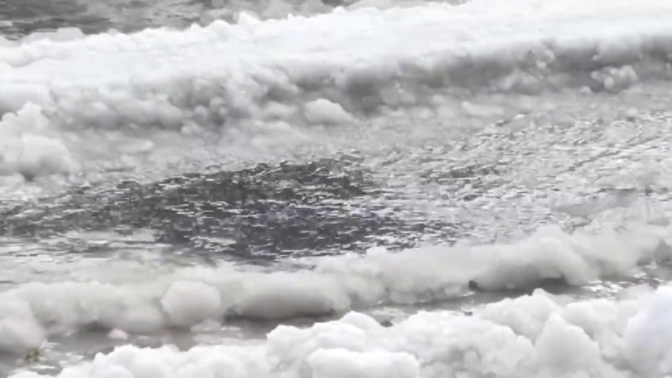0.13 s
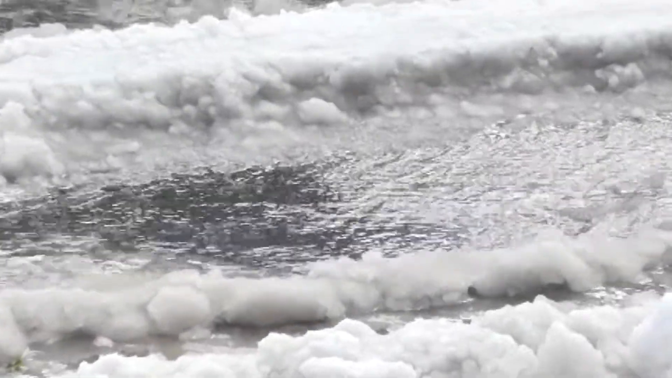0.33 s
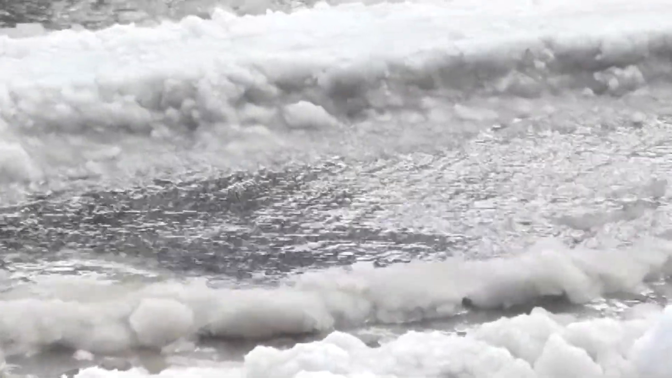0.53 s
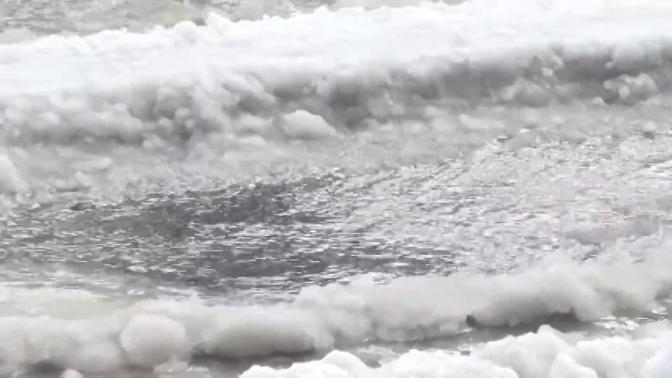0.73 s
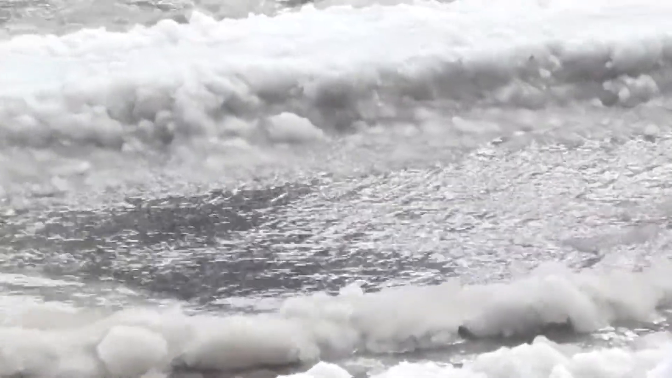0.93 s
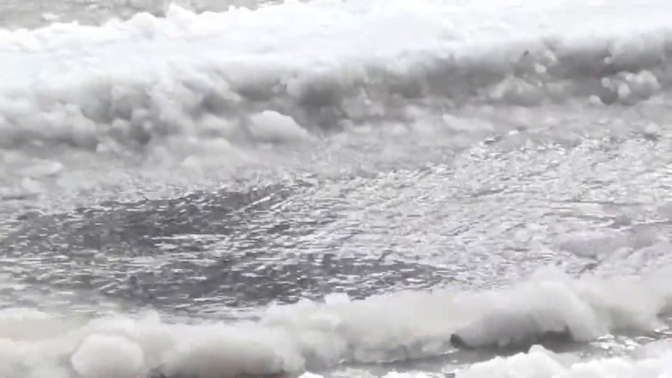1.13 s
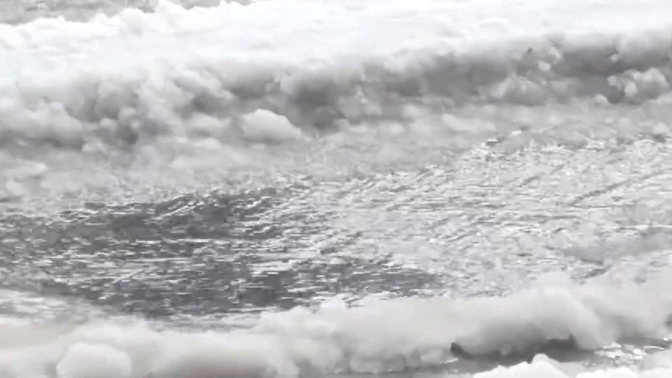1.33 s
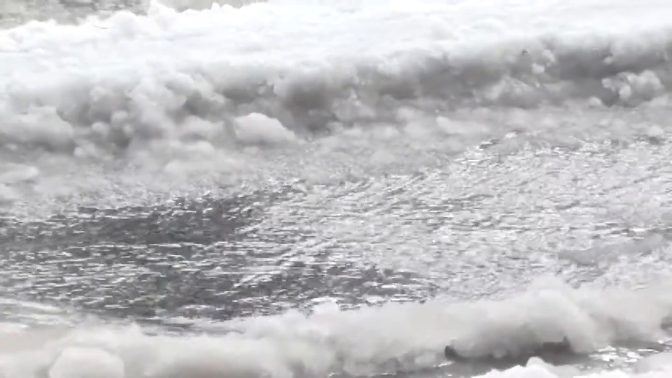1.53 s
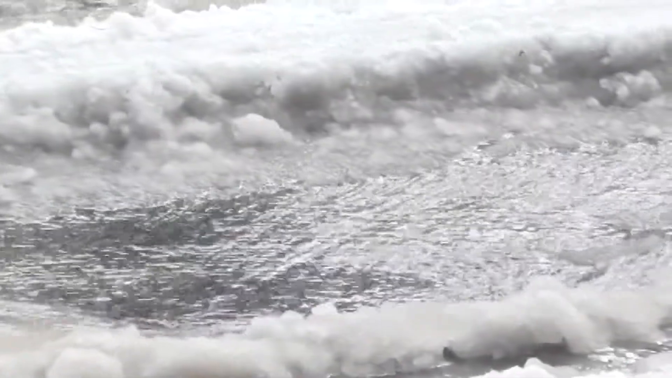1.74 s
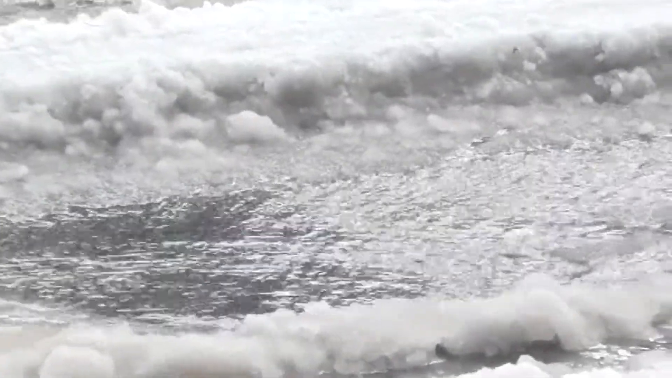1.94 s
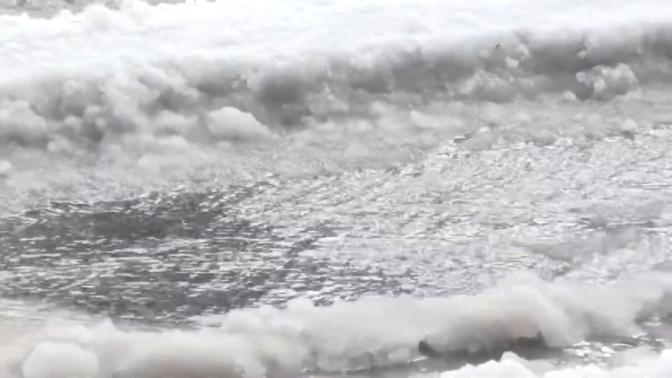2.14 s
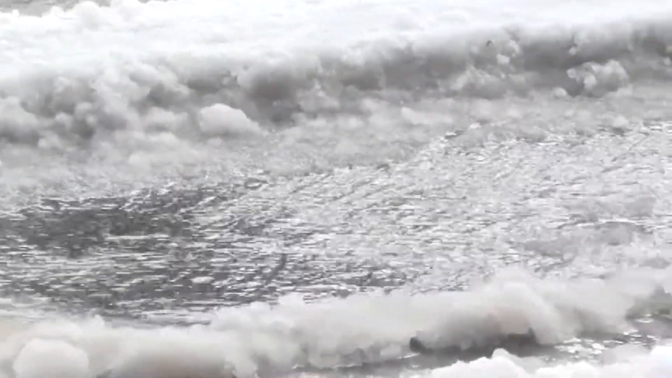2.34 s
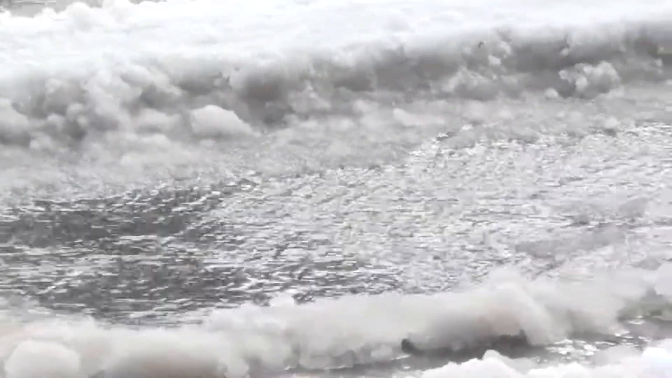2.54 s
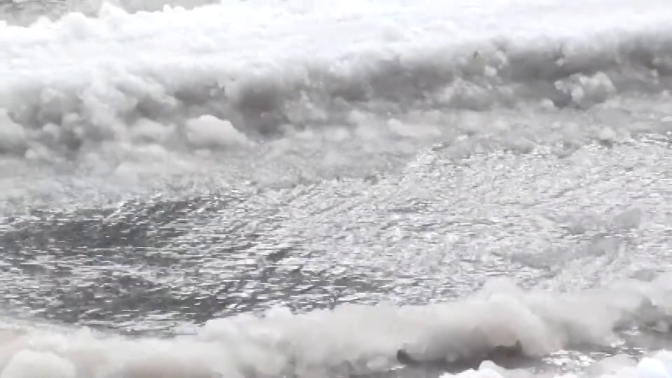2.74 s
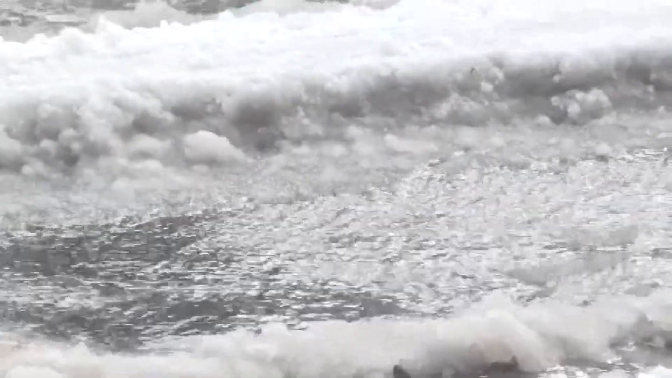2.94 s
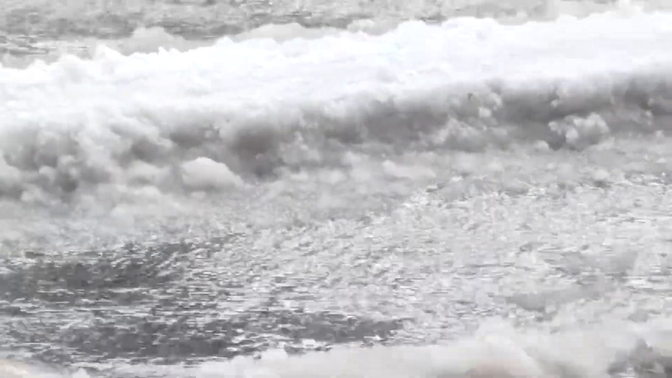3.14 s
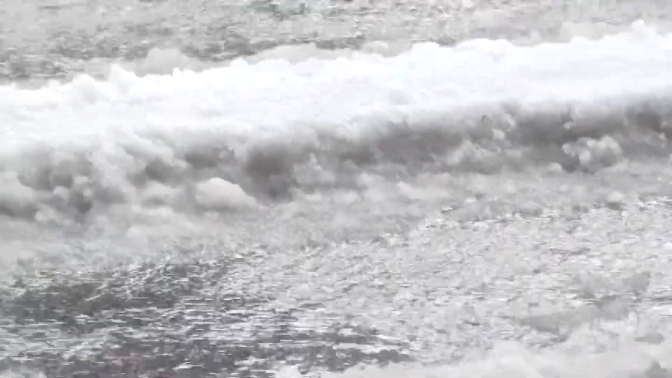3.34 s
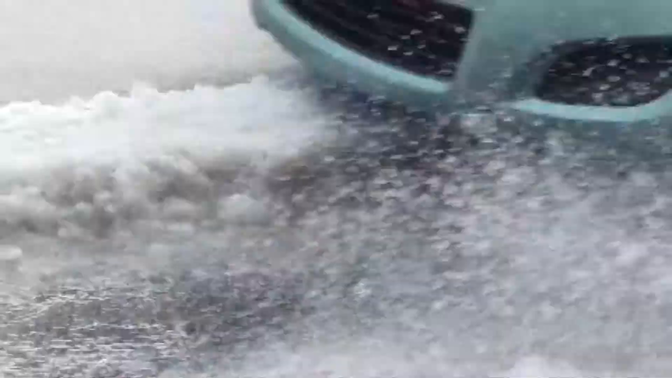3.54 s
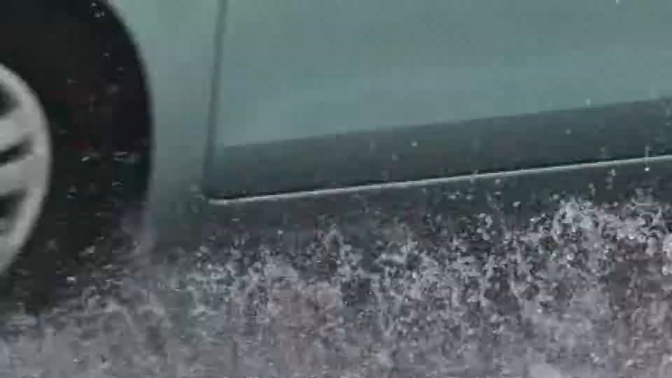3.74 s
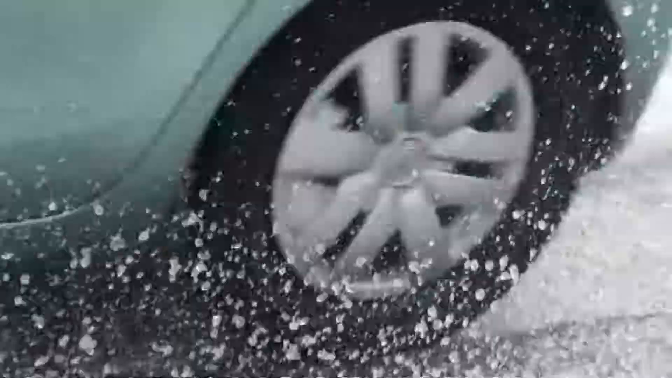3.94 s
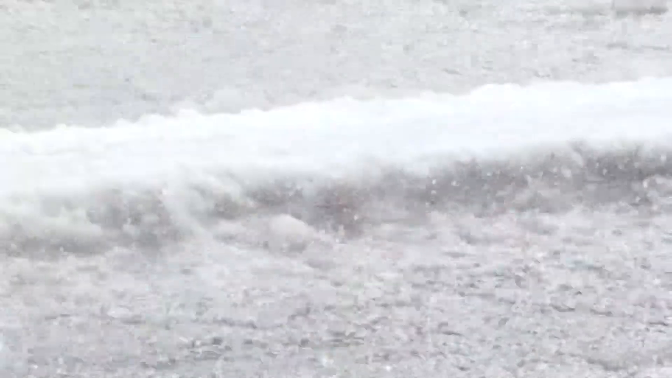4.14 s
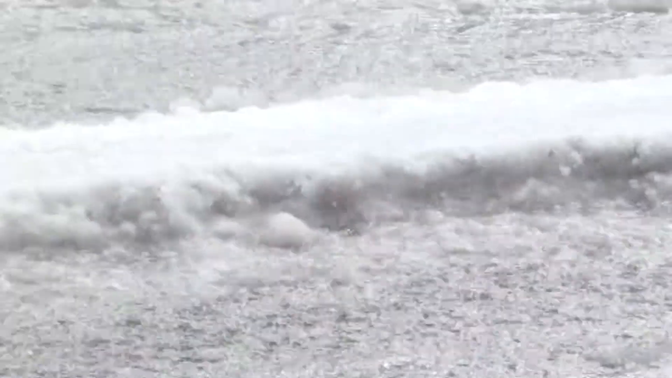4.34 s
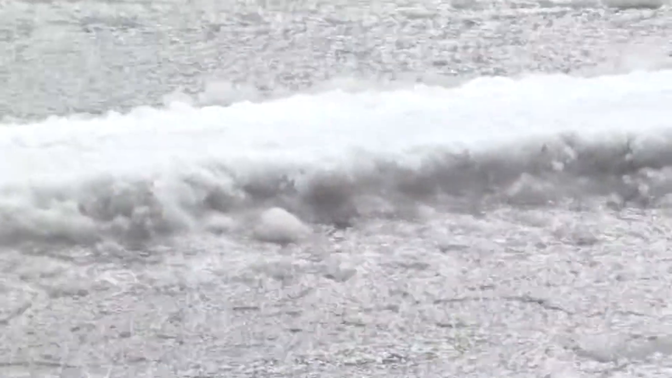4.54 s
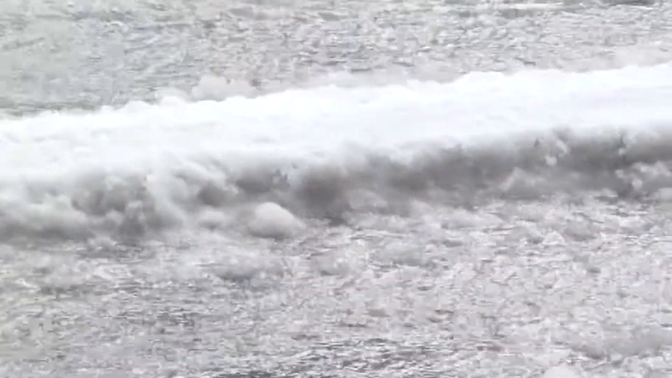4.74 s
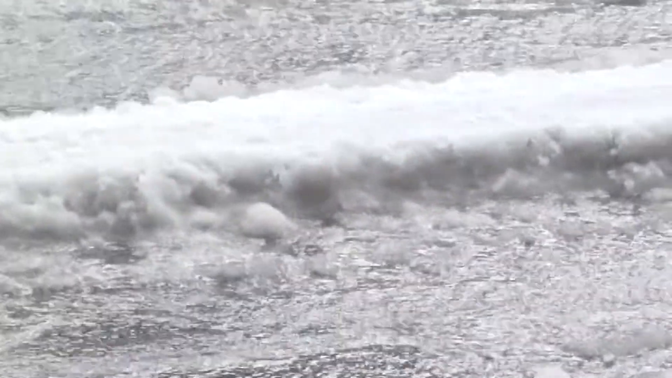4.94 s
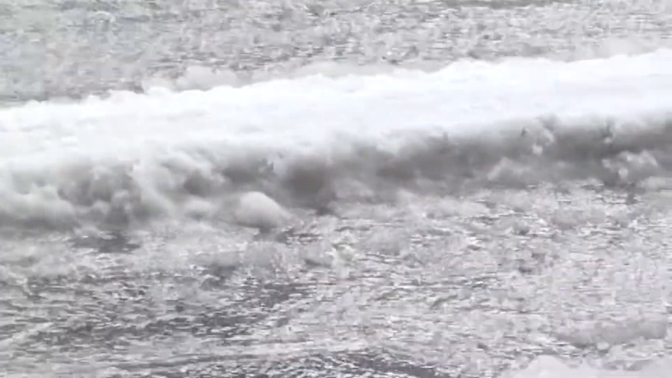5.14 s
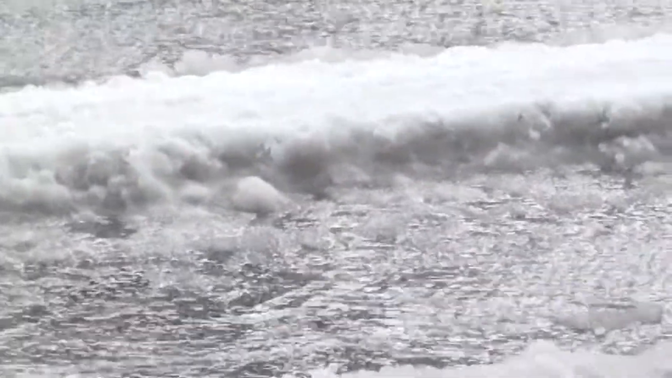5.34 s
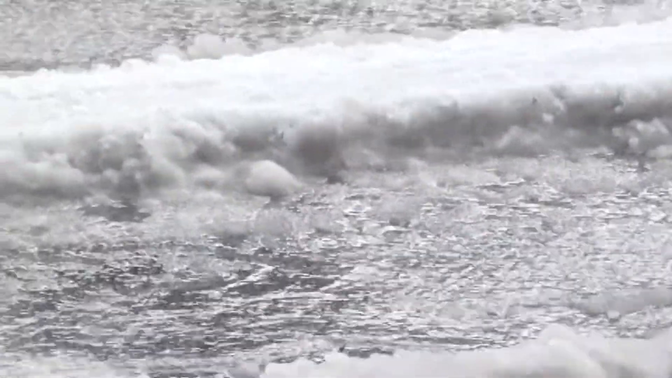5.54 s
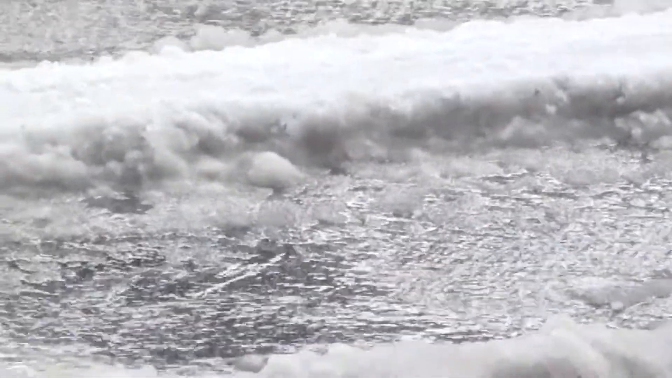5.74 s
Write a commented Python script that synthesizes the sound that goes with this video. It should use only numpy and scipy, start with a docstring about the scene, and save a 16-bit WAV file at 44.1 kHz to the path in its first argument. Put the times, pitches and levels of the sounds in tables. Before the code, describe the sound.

A wide wet street heard outdoors from the kerb with a stereo microphone. At the start, the spray of a car already past settles; slush lumps drop with small hollow, rising plops at 0, 0.2, 0.3 and 0.6 s, and water gurgles briefly. A second car passes farther off around 1.3 s, a soft hiss with a faint low engine hum that sinks in pitch. Sharper wet knocks come at 1.0 and 1.5 s, with more gurgling. It quiets; wind buffets softly near 2.4 s and thumps at 3.0 and 3.4 s. A near car's wet hiss swells quickly, and from 3.4 to 4.3 s its tyres roar through the puddle with dense hissing, crackling spray and knocks at 3.5, 3.9 and 4.3 s. It then moves left, a faint exhaust hum under a hollow fading hiss, thrown water landing around 4.7 s. Low wind thumps follow near 5.0 and 5.6 s.

```python
"""A slushy city street from the kerb: one car is already past, a second hisses by further off,
then a near one ploughs through the puddle and leaves to the left.
Filtered noise and droplet impacts make the tyres' roar, hiss and spray; sine tones make the engines.
Lumps of slush plop as short rising notes, ringing bubbles gurgle in the puddle,
and low noise and single pressure swings are the wind buffeting the two-port microphone."""
import sys
import numpy as np
from scipy import signal
from scipy.fft import rfft, irfft, next_fast_len
from scipy.io import wavfile
from scipy.ndimage import uniform_filter1d, map_coordinates

SR = 44100
rng = np.random.default_rng(int(sys.argv[2]) if len(sys.argv) > 2 else 0)


def to_wav(sig):
    """Store sig (one row per channel, or 1-D mono) as 16-bit WAV at the path in sys.argv[1].

    Samples outside -1..1 are clipped; the rate is SR.
    """
    pcm = np.clip(np.atleast_2d(sig), -1, 1) * 32767
    pcm = np.round(pcm).astype(np.int16)
    wavfile.write(sys.argv[1], SR, pcm.T)  # frames by channels


N = 259749

# how alike wet sounds reach the two ports: (frequency [Hz], left-right correlation [0-1])
LIKENESS = [(300, .98), (700, .975), (1300, .94), (2400, .92), (3900, .89), (5500, .92), (8000, .95),
            (11000, .97), (14000, 1)]
# two cars further off, then the near one, levels when abreast and before colouring:
# (time abreast [s], distance [m], thrown water [dB re its landing level],
#  rumble [dB], tread roar [dB], water hiss [dB], fine spray [dB])
PASSING_CARS = [(-.75, 12.4, 0, -47, -37.5, -34.4, -28.6), (1.35, 7, -15, -56, -48, -36.6, -46),
                (3.66, 5.9, 0, -34.4, -25.2, -19.3, -22.2)]
NEAR_CAR = PASSING_CARS[-1]
NEAR_S = NEAR_CAR[0]
SPEED_M_PER_S = 8


def amp(db):
    """Decibels to gain."""
    return 10 ** (np.asarray(db) / 20)


def unit(x):
    """Scale to rms 1."""
    return x / np.sqrt(np.mean(x ** 2) + 1e-20)


def along(points, hz):
    """Read (Hz, value) points on a log-frequency axis."""
    f, v = np.transpose(points)
    return np.interp(np.log(hz + 1), np.log(f + 1), v)


def curves(rows, at=None):
    """Interpolate each column after the first, at every sample's time by default."""
    knots, *columns = np.transpose(rows)
    at = np.arange(N) / SR if at is None else at
    return [np.interp(at, knots, column) for column in columns]


def wobble(rate):
    """A smooth random curve, rate knots a second."""
    knots = rng.standard_normal(int(N * rate / SR) + 4)
    return map_coordinates(knots, [np.arange(N) * rate / SR])


def filtered(x, response):
    """Multiply the spectrum of x by a response of frequency."""
    m = next_fast_len(N + SR // 2)
    return irfft(rfft(x, m) * response(np.fft.rfftfreq(m, 1 / SR)), m)[..., :N]


def spread(pair, spectrum, alike):
    """Turn two unrelated signals into one coloured stereo sound of rms 1."""
    def mid_side_gains(hz):
        # half the angle whose cosine is the wanted correlation
        turn = np.arccos(np.clip(along(alike, hz), -1, 1)) / 2
        return amp(along(spectrum, hz)) * [np.cos(turn), np.sin(turn)]

    mid, side = filtered(pair, mid_side_gains)
    return unit(np.array([mid + side, mid - side]))


def bump(hz, centre_hz, octaves):
    """A bell on a log-frequency axis."""
    return np.exp(-.5 * (np.log2((hz + 1) / centre_hz) / octaves) ** 2)


def bell(t, s, half_s):
    """A bell in time, 1 at s and 1/e at half_s to either side."""
    return np.exp(-((t - s) / half_s) ** 2)


def swells(rows):
    """The joint envelope of bursts, each with a bell-shaped power."""
    t = np.arange(0, N / SR, .001)
    power = sum(amp(db) ** 2 * bell(t, s, half_s) for s, db, half_s in rows)
    return np.interp(np.arange(N) / SR, t, np.sqrt(power))


def past(t, car=NEAR_CAR):
    """Metres that a car (the near one by default) has gone past the microphone."""
    return SPEED_M_PER_S * (t - car[0])


def beyond(t, metres, over_m):
    """Rises from 0 to 1 as the near car gets this far past."""
    return .5 + .5 * np.tanh((past(t) - metres) / over_m)


def traffic(sound, t):
    """Level (dB) of one sound of all cars, and their power-weighted view: -1 ahead, 1 from behind."""
    # how each sound carries: (loss per doubling of distance [dB], gain towards the rear [dB],
    # landing of thrown water [dB re the car's level], distant traffic [dB])
    carry = {"rumble": (6.2, 4.2, -25, -42.5), "roar": (5.4, 4.2, -2.8, -43.5),
             "hiss": (11.8, 7, -2.3, -33.9), "spray": (19.2, 7, -8.6, -50.4)}
    # thrown water lands this long after the car, spread over this half length
    landing_s, landing_half_s = 1.08, .29
    loss_db, rear_db, landing_db, distant_db = carry[sound]
    power, view = amp(distant_db) ** 2, 0
    for car in PASSING_CARS:
        s, distance, thrown_db, *levels = car
        db = dict(zip(carry, levels))[sound]
        r = np.hypot(past(t, car), distance)
        behind = past(t, car) / r
        rolling = amp(db - loss_db * np.log2(r / distance) + rear_db * behind) ** 2
        landing = amp(db + thrown_db + landing_db) ** 2 * bell(t, s + landing_s, landing_half_s)
        power = power + rolling + landing
        view = view + behind * (rolling + landing)
    return 10 * np.log10(power), view / power


def patter(rate, size_db):
    """Droplet impacts at random moments and of unequal sizes, rms 1."""
    hit = rng.random((2, N)) < rate / SR
    size = amp(size_db * np.minimum(rng.exponential(size=(2, N)), 1.8))
    return unit(hit * size * np.sign(rng.standard_normal((2, N))))


def wet_rush(spectrum, drop_rate, drops_db, churn_db):
    """A rush of water with droplets in it, churning as the tread meets uneven slush."""
    water = rng.standard_normal((2, N)) + amp(drops_db) * patter(drop_rate, size_db=4.5)
    churn = unit(wobble(9) + wobble(30) + wobble(80))
    return amp(churn_db * churn) * spread(water, spectrum, LIKENESS)


def bubbles(count, pitch_hz, octaves, cycles, rise):
    """Scattered bubbles of rms 1; each rings for some cycles and rises in pitch."""
    draw = rng.standard_normal((count, 3))  # pitch, size, place from left to right
    starts = rng.integers(0, N, count)
    t = np.arange(SR // 30) / SR
    turns = np.minimum(pitch_hz * 2 ** (octaves * draw[:, :1]), SR / 4) * t
    age = np.minimum(turns / cycles, 8)
    size = amp(4.5 * draw[:, 1:2].clip(-2, 1.5))
    rings = size * np.exp(-age) * np.sin(2 * np.pi * turns * (1 + rise * age))
    places = (starts[:, None] + np.arange(len(t))).ravel()
    ports = []
    for side in (1, -1):
        heard = rings * amp(side * 2.9 * draw[:, 2:])
        ports.append(np.bincount(places, heard.ravel(), N)[:N])
    return unit(np.array(ports))


def patches(shape):
    """A smooth random field of rms 1 over frequency and time."""
    field = uniform_filter1d(rng.standard_normal(shape), size=3, axis=0)
    return unit(uniform_filter1d(field, size=30, axis=1))


def drive_past(x, spray_peak_db=2.5, split_db=3, ripple_db=1, horn_db=6, bow_db=3.3,
               street_db=1, street_falls=.27):
    """Colour, width and direction change with the near car's place and the level of the spray."""
    # where the tyres are heard: (time [s], left minus right before shading [dB])
    bearing = [(0, 1), (2.05, 1.9), (2.75, -1.5), (3.8, 0), (4.13, 1), (4.46, 4.6), (4.9, 6), (5.89, 4.8)]
    # how the microphone body shades the far port: (frequency [Hz], share of the bearing)
    shade = [(500, -.1), (900, 0.28), (1300, .7), (2200, .9), (3000, 1.4), (3700, 1.9), (4600, 0.4),
             (6000, 1.2), (7500, 0.87), (9300, 1.5), (11500, -0.078)]
    # road echo: (near car past [m], notch [Hz], band with the ports out of step [Hz])
    notches = [(0, 400, 4550), (9, 510, 4380), (18, 560, 4850)]
    # the left port hears the road first: (frequency [Hz], phase lead [rad])
    lead_road = [(100, .05), (500, .35), (1200, .5), (2000, .3), (3700, .33), (5000, 0)]
    # what a car seen from behind adds, scaled by the echo: (frequency [Hz], phase lead [rad])
    lead_behind = [(1200, -.1), (2300, .25), (3100, .1), (4200, .6), (4740, -.8), (5700, -.4), (7200, -.45),
                   (9800, .2), (13000, 0)]
    # metres past where the road echo sets in, and where the tread horn points at the kerb
    echo_m, horn_m = 4.7, 12.3
    # the spray's brightest band abreast, and its fall from there to a view from behind
    spray_hz, spray_sink_octaves = 8150, .2

    hz, t, (left, right) = signal.stft(x, SR, nperseg=1024)
    hz = hz[:, None]
    spray_db, view = traffic("spray", t)
    low_hz, high_hz = curves(notches, past(t))
    echo = .92 * beyond(t, echo_m, over_m=1.6)

    # the echo off the road cancels in a notch that climbs as the car draws away
    colour_db = -8.5 * echo * bump(hz, low_hz, octaves=0.56)
    # echoes off the snow banks ripple the treble
    colour_db += ripple_db * patches(left.shape) * bump(hz, 6000, octaves=1.8)
    # the wedge between tread and road is a horn that beams backwards, and so does the top sizzle
    colour_db += horn_db * beyond(t, horn_m, over_m=1.5) * bump(hz, 1940, octaves=0.31)
    colour_db += (7 * echo - 7) * bump(hz, 13500, octaves=0.088)
    # sheets of water hiss in the middle as the front tyres arrive
    colour_db += bow_db * bell(t, NEAR_S - .15, half_s=.52) * bump(hz, 3100, octaves=0.19)
    # above them the hiss is hollow while the car goes by
    colour_db -= 1.4 * bell(t, NEAR_S + .25, half_s=.45) * bump(hz, 5200, octaves=.25)
    # fine mist is brightest higher up
    mist_hz = spray_hz * 2 ** (-spray_sink_octaves * view)
    colour_db += spray_peak_db * bump(hz, mist_hz, octaves=0.19)

    # sound from the side reaches the two ports out of step in two narrow bands
    split = bump(hz, high_hz, octaves=0.12) + 0.73 * bump(hz, 2.5 * high_hz, octaves=0.15)
    split = echo * split
    mid = (left + right) / 2 * amp(-9 * split)
    # the wide street echo gives way to direct sound when a car is close
    width_db = street_db - street_falls * (spray_db - spray_db.mean()) + split_db * split
    side = (left - right) / 2 * amp(width_db)

    lean_db = curves(bearing, t)[0] * along(shade, hz)
    ports = amp(np.array([lean_db, -lean_db]) / 2)
    ports = ports / ports.mean(axis=0)
    lead = along(lead_road, hz) + echo * along(lead_behind, hz)
    phase = np.exp(.5j * np.array([lead, -lead]))
    z = np.array([mid + side, mid - side]) * amp(colour_db) * ports * phase
    return signal.istft(z, SR, nperseg=1024)[1][:, :N]


def tyres():
    """The tread roars, squeezes out hissing water and flings up spray; fine ringing bubbles follow the hiss."""
    # relative spectra of the three: (frequency [Hz], density [dB])
    roar_spectrum = [(150, -40), (300, -10), (420, -5.5), (600, 2), (780, 2.5), (1100, 1.5), (1500, 0.5),
                     (2000, -5.5), (3000, -9), (6000, -43)]
    hiss_spectrum = [(700, -30), (1300, -6.5), (1800, 0.5), (2250, -0.5), (2900, -0.14), (3400, -0.15),
                     (4200, 0), (5200, 0.5), (6200, -2.5), (7200, -5.5), (8500, -17.5), (11000, -37),
                     (16000, -30)]
    spray_spectrum = [(3000, -24), (5500, -20), (6500, -5), (7200, -2), (8300, -1), (9200, -4.5),
                      (10200, -7), (12000, -11), (13800, -11), (15500, -18)]
    # the near car's wheels hit the puddle: (time [s], spray before colouring [dB], half length [s])
    wheels = [(3.36, -29.5, .08), (3.63, -28, .07), (4.19, -24.5, .08)]
    # the roar dips briefly as the rear wheel goes by
    dip_s, dip_db, dip_half_s = 4.09, 5.5, .07

    t = np.arange(N) / SR
    roar_db, hiss_db, spray_db = (traffic(sound, t)[0] for sound in ("roar", "hiss", "spray"))
    roar = wet_rush(roar_spectrum, drop_rate=400, drops_db=-7.5, churn_db=1.0)
    roar *= amp(roar_db - dip_db * bell(t, dip_s, dip_half_s))
    splash = swells(wheels)
    hiss = wet_rush(hiss_spectrum, drop_rate=1500, drops_db=-9, churn_db=.5)
    hiss *= np.hypot(amp(hiss_db), amp(-1.5) * splash)
    spray = wet_rush(spray_spectrum, drop_rate=3500, drops_db=-6.5, churn_db=0.7)
    spray *= np.hypot(amp(spray_db), splash)
    ringing = bubbles(count=2500, pitch_hz=2998, octaves=.5, cycles=11, rise=.01)
    ringing *= amp(hiss_db - 11.5)
    return drive_past(roar + hiss + spray + ringing)


def hum(hz, db, waver_db):
    """The firing tone of an engine, a sine of slightly unsteady level."""
    level = np.sqrt(2) * amp(db + waver_db * wobble(7))
    return level * np.sin(2 * np.pi * np.cumsum(hz) / SR)


def cars():
    """Engine tones over the rumble of the car bodies, which is low noise."""
    # a low engine tone, loudest and then sinking in pitch as the second car passes:
    # (time [s], firing tone [Hz], mean level [dB])
    low_engine = [(0, 68, -43), (.7, 68, -42.5), (1.4, 68, -40), (1.85, 65.3, -41.5), (2.2, 64.5, -45),
                  (4.2, 64.5, -49), (5.89, 64, -43)]
    # relative rumble spectrum: (frequency [Hz], density [dB])
    rumble_spectrum = [(20, -24), (35, -12), (52, -1), (80, 0.5), (120, 3), (200, 3), (280, 3), (380, -5),
                       (600, -19), (1500, -50)]
    t = np.arange(N) / SR
    rumble = spread(rng.standard_normal((2, N)), rumble_spectrum, [(100, 0.93)])
    rumble *= amp(traffic("rumble", t)[0] + 1.36 * wobble(16))
    # the near car's exhaust is heard once its tail shows; its pitch sags by 2.4 Hz a second
    exhaust = hum(105.5 - 2.4 * (t - NEAR_S), -47.5, waver_db=3.0)
    exhaust *= beyond(t, 4.3, over_m=1.8)
    return rumble + hum(*curves(low_engine), waver_db=0.7) + exhaust


def gurgles():
    """Big bubbles crowd together where the water runs back; smaller ones lap in the puddle throughout."""
    # water gurgling back into the ruts: (time [s], level [dB], half length [s])
    backflow = [(.165, -32.5, .085), (.62, -41, .06), (1.47, -37.5, 0.034), (1.63, -35, 0.037)]
    crowds = bubbles(count=2200, pitch_hz=650, octaves=0.247, cycles=3.2, rise=.02)
    lapping = bubbles(count=150, pitch_hz=851, octaves=.2, cycles=4, rise=.02)
    return swells(backflow) * crowds + amp(-45.5) * lapping


def wind(lag=.25):
    """Gusts over a light breeze break into short eddies that thump on the two ports, the right one first."""
    # gusts on the microphone: (time [s], level before eddies [dB], half length [s])
    gusts = [(.47, -29.5, .035), (1.08, -36, .02), (2.42, -29.5, .04), (2.45, -34.5, .24),
             (3.008, -25, .018), (3.115, -30, .018), (3.38, -23.5, .08), (4.25, -30, .035),
             (5.1, -26, .035), (5.48, -29, .018), (5.575, -26.5, .055)]
    # relative spectrum of the thumps: (frequency [Hz], density [dB])
    buffet = [(20, -26), (45, -11), (80, 0), (130, 1), (190, 2.5), (260, -4), (400, -12), (800, -21),
              (2500, -49)]
    breeze_db, eddy_db = -44.5, 2.7
    eddies = unit(amp(eddy_db * wobble(70).clip(-2, 1.5)))
    strength = np.hypot(swells(gusts), amp(breeze_db)) * eddies
    thumps = spread(rng.standard_normal((2, N)), buffet, [(60, .9), (110, .9), (200, .6), (350, .3)])
    lags = np.array([[-lag], [lag]])  # radians, left and right
    return strength * filtered(thumps, lambda hz: np.exp(1j * lags * bump(hz, 260, octaves=1.3)))


def plops(splash_t60=0.054, rise=1.1):
    """Each lump knocks with a short, rising hollow note and throws a splash; a smaller piece follows."""
    # slush lumps landing:
    # (time [s], knock at onset [dB], starting pitch [Hz], ring t60 [s], splash at onset [dB])
    lumps = [(.014, -22, 272, .07, -45), (.212, -19, 520, .045, -35), (.322, -24.5, 756, .05, -38),
             (.569, -24.5, 755, .055, -36), (.665, -26, 678, .04, -27), (1.026, -21, 900, .025, -25.5),
             (1.031, -24, 265, .06, -27), (1.482, -16, 340, .022, -20), (1.581, -18, 650, .045, -26),
             (3.507, -12, 704, .028, -30), (3.901, -16, 850, .031, -32), (4.285, -17, 275, .049, -27)]
    piece_s, piece_db = .026, -10  # the smaller piece: delay, level against its lump
    wet_spectrum = [(150, -10), (350, 1), (800, -6), (1800, -4), (4000, -8), (7000, -9), (12000, -28)]
    knocks, splashes = np.zeros((2, N + SR))
    t = np.arange(SR // 5) / SR

    def note(hz, t60):
        return amp(-60 * t / t60) * np.sin(2 * np.pi * hz * t * (1 + rise * t))

    for s, db, hz, t60, splash_db in lumps:
        start, piece_start = round(s * SR), round((s + piece_s) * SR)
        knocks[start:][:len(t)] += amp(db) * note(hz, t60)
        piece = note(hz * rng.uniform(.9, 1.3), t60)
        knocks[piece_start:][:len(t)] += amp(db + piece_db) * piece
        splashes[start:][:len(t)] += amp(splash_db - 60 * t / splash_t60)
    wet = spread(rng.standard_normal((2, N)), wet_spectrum, LIKENESS)
    return knocks[:N] + splashes[:N] * wet


def pops(cycles=1.07, lag=0.5):
    """Each eddy is one short swing of pressure that reaches the two ports out of step."""
    # single eddies that hit a port squarely:
    # (time [s], nominal peak [dB], pitch [Hz], left minus right [dB])
    hits = [(.811, -21.5, 190, -4), (2.995, -13.5, 193, 3), (2.993, -17, 420, -3), (3.347, -15, 260, 0),
            (3.396, -13.5, 185, 0), (5.006, -16, 270, -4), (5.027, -16.5, 300, -2), (5.642, -17, 150, 0),
            (5.696, -21, 150, 0)]
    out = np.zeros((2, N))
    near = np.arange(-SR // 20, SR // 20)
    sides = np.array([[1], [-1]])
    for s, db, hz, pan_db in hits:
        turns = hz * near / SR
        swing = np.exp(-(turns / cycles) ** 2) * np.cos(2 * np.pi * turns - sides * lag)
        out[:, round(s * SR) + near] += amp(db + sides * pan_db / 2) * swing
    return out


def scene():
    """The street at the kerb."""
    return tyres() + cars() + gurgles() + wind() + plops() + pops()


def record(dry):
    """Nothing is heard from 15.9 kHz up."""
    return filtered(dry, lambda hz: hz < 15900)


dry = scene()
out = record(dry)
to_wav(out)
```